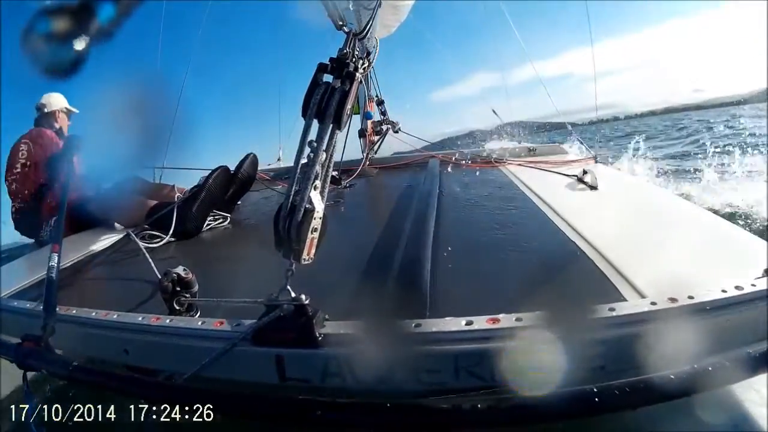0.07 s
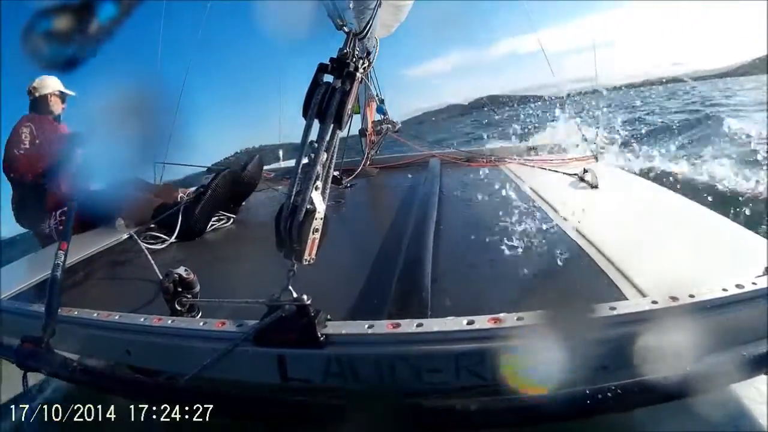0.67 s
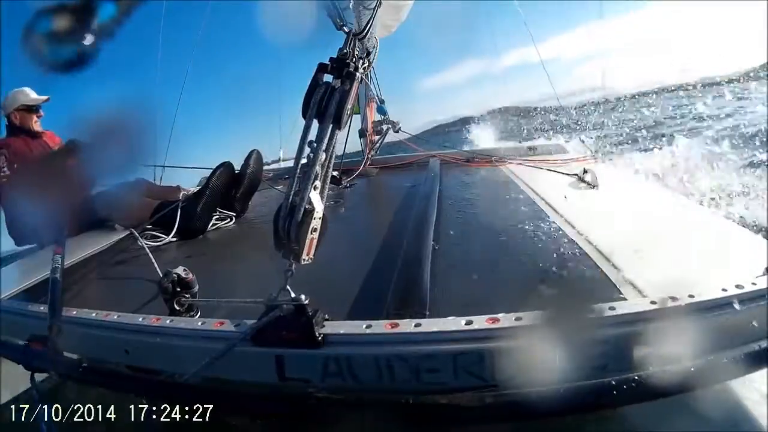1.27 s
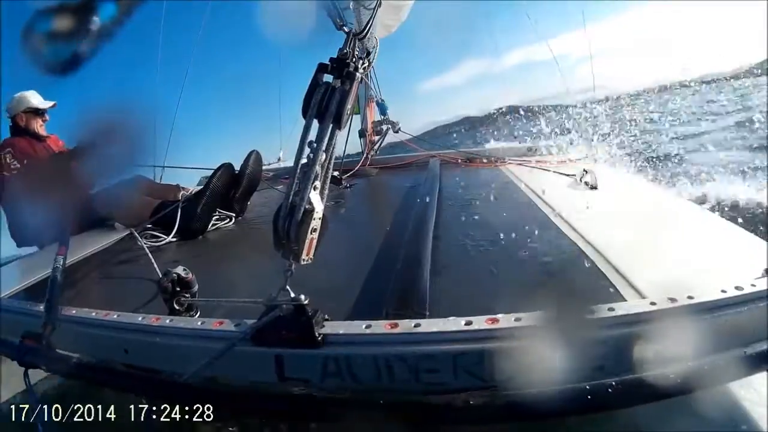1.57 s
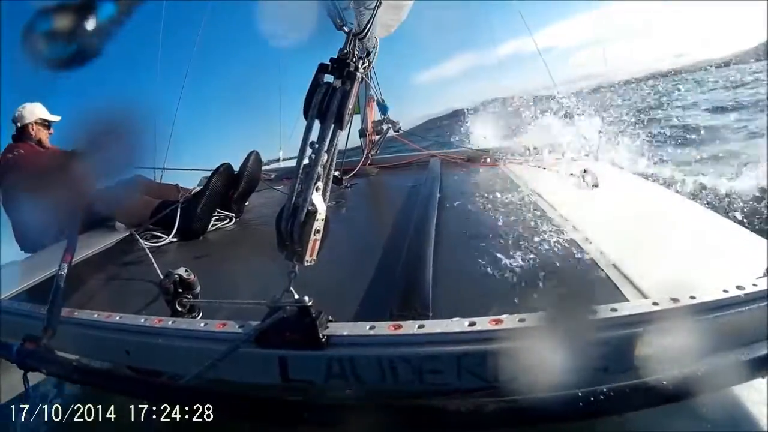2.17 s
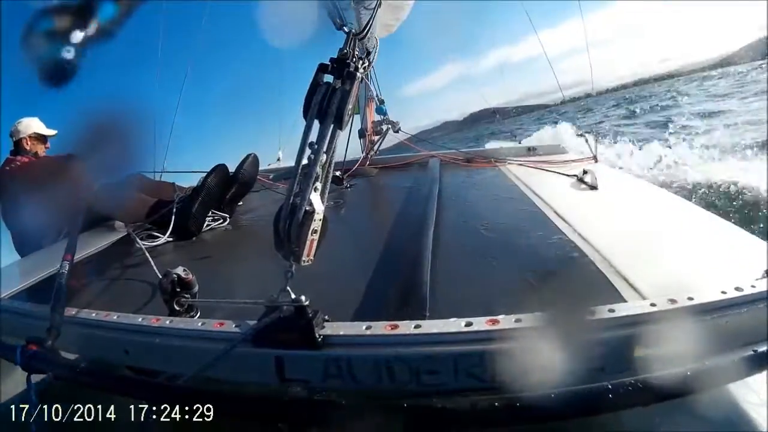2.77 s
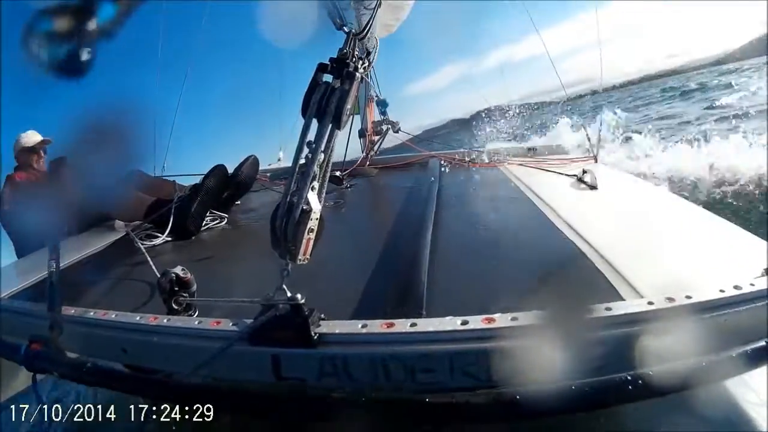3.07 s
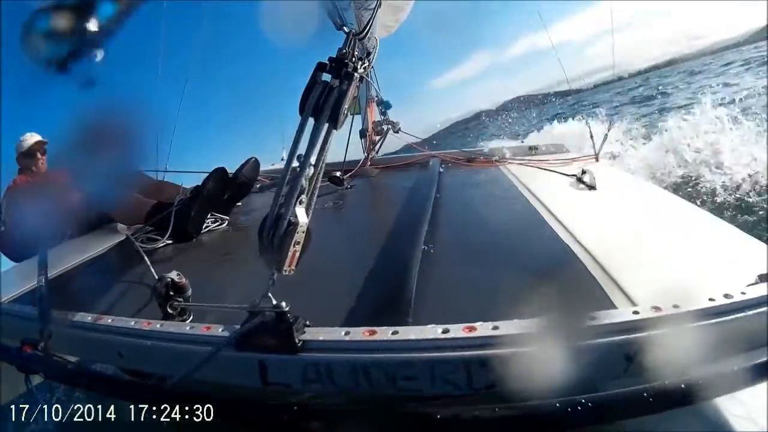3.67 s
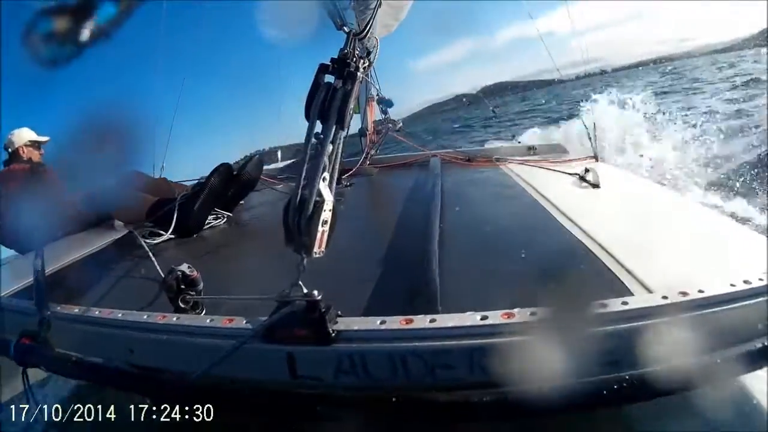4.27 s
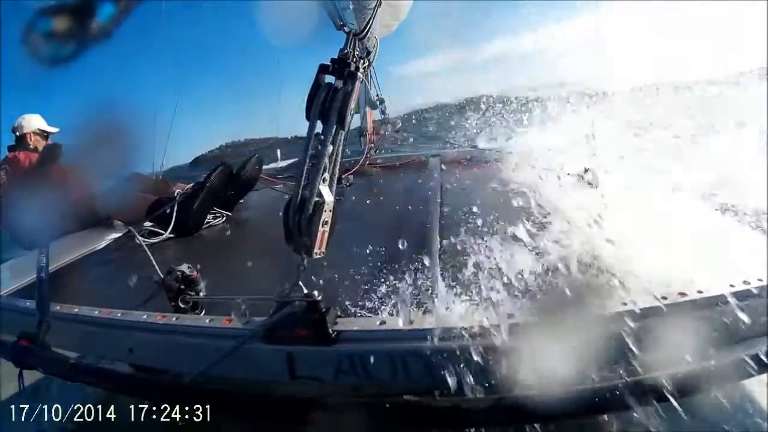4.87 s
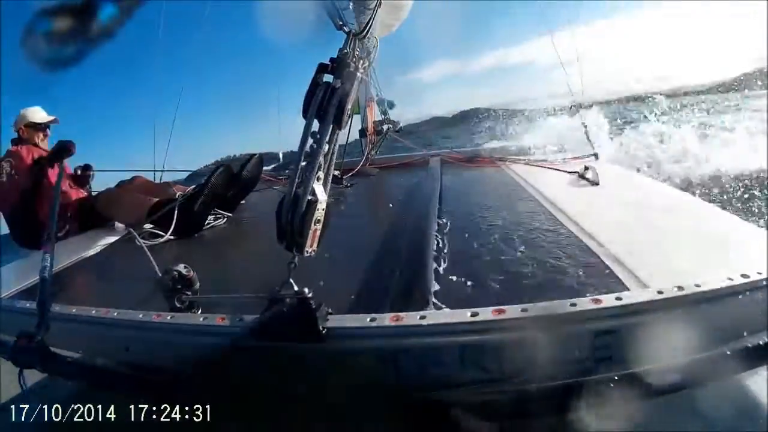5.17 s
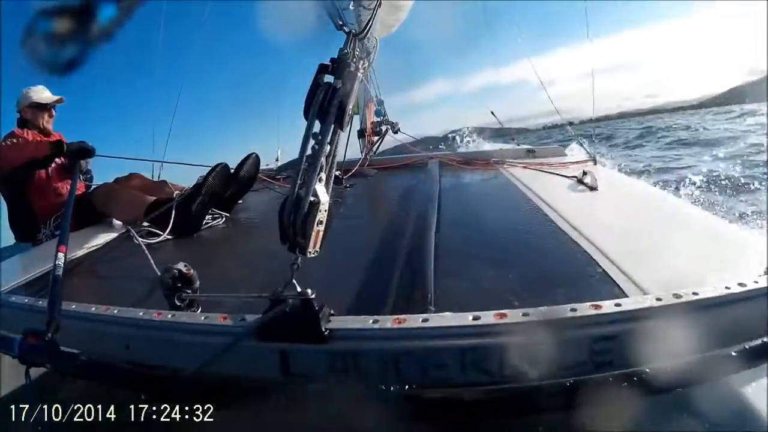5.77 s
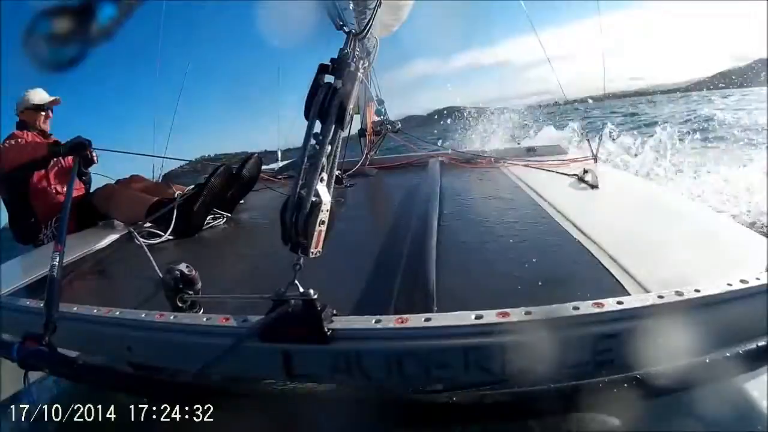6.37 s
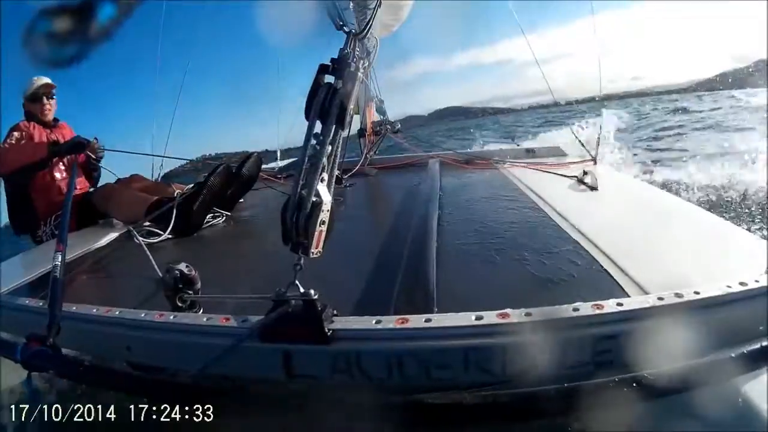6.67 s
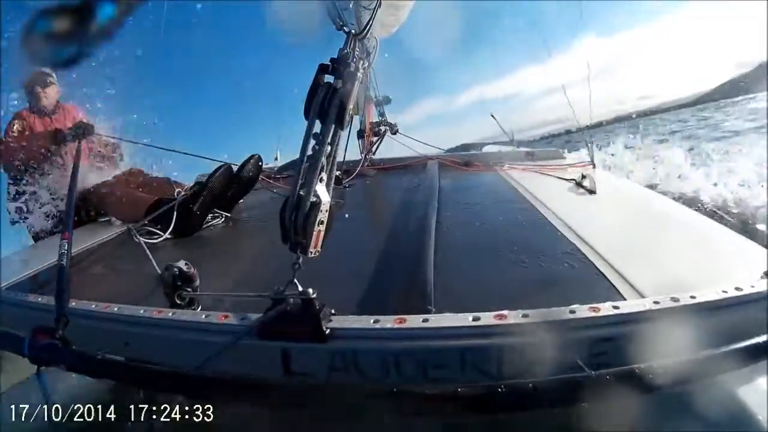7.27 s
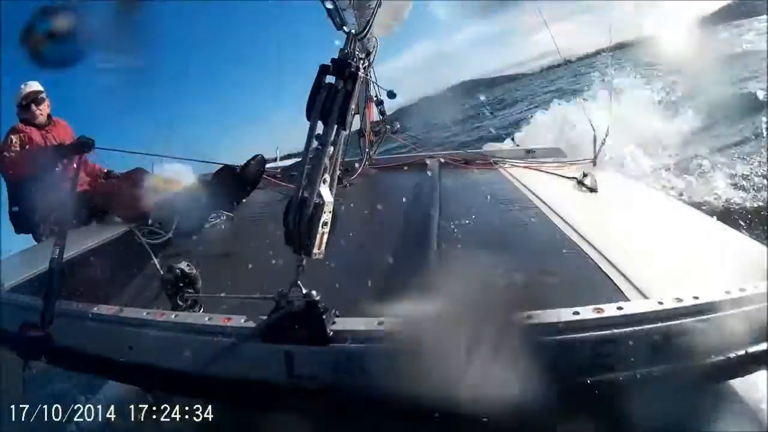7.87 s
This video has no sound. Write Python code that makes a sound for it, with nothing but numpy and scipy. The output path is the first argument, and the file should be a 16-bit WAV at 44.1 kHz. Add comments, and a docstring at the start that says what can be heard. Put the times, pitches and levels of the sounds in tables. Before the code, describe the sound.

A catamaran sails through chop, heard from a microphone in a waterproof case on the stern. Low wind rumble and muffled, hollow churning swell with each wave while spray ticks on the case. Midway, waves knock the hulls in a quick cluster, with rattling fittings, a brief hull groan and a rope creak. Later a hull slams with a boom, then a sheet of water splatters over the microphone.

```python
"""Catamaran through chop

Heard from a camera in a waterproof case on the stern. Wind and water shake the mount into a low boom, and the
wash comes through the case muffled and hollow. Waves slap and slam the hulls; in the hardest shakes fittings
chatter, the boat judders and groans and a rope creaks. Spray patters, then a sheet of water hits."""
import sys
import numpy as np
from scipy import signal
from scipy.fft import rfft, irfft, next_fast_len
from scipy.io import wavfile
from scipy.ndimage import uniform_filter1d, map_coordinates

SR = 44100
rng = np.random.default_rng(int(sys.argv[2]) if len(sys.argv) > 2 else 0)


def generate_wav(sig):
    """Save sig (samples, or channels by samples) to the path in sys.argv[1] as 16-bit PCM at SR."""
    pcm = np.round(np.clip(np.atleast_2d(sig).T, -1, 1) * 32767).astype(np.int16)
    wavfile.write(sys.argv[1], SR, pcm)


N = 348819


def amp(db):
    """Decibels to gain."""
    return 10 ** (np.asarray(db) / 20)


def unit_rms(x):
    """Scaled to rms 1."""
    return x / np.sqrt(np.mean(x ** 2) + 1e-20)


def unit_peak(x):
    """Scaled to peak 1."""
    return x / (np.abs(x).max() + 1e-20)


def eq_db(points, hz):
    """An EQ curve through (freq_hz, gain_db) points, on a log frequency axis."""
    freqs, gains = np.transpose(points)
    return np.interp(np.log(hz + 1), np.log(freqs + 1), gains)


def band_db(hz, centre_hz, q):
    """Gain of one broad resonance."""
    return -10 * np.log10(1 + (q * ((hz + 1) / centre_hz - centre_hz / (hz + 1))) ** 2)


def wobble(rate_hz):
    """A smooth random curve with rate_hz knots a second."""
    knots = rng.standard_normal(int(N * rate_hz / SR) + 4)
    return map_coordinates(knots, [np.arange(N) * rate_hz / SR])


def swell(peak_s, rise_s, fall_s, db):
    """A power envelope that gains 20 dB over the rise and loses 20 dB over the fall."""
    t = np.arange(N) / SR - peak_s
    return amp(db - 20 * np.minimum(np.maximum(-t / rise_s, t / fall_s), 10)) ** 2


def add(track, start_s, x):
    """Mix x into the track at start_s."""
    i = max(round(start_s * SR), 0)
    track[i:i + len(x)] += x[:max(len(track) - i, 0)]


def coloured(x, gain_db):
    """x through the minimum-phase filter whose gain is gain_db(hz)."""
    size = 2 * next_fast_len(len(x) // 2 + 4096)
    cepstrum = irfft(np.log(amp(gain_db(np.fft.rfftfreq(size, 1 / SR)))), size)
    cepstrum[1:size // 2] *= 2
    cepstrum[size // 2 + 1:] = 0
    return irfft(rfft(x, size) * np.exp(rfft(cepstrum)), size)[:len(x)]


def impacts(spread_db, count):
    """Tiny impacts at random moments, a few much larger than the rest."""
    where = rng.integers(0, N, count)
    size = np.minimum(rng.exponential(size=count), 4)
    return unit_rms(np.bincount(where, rng.choice([-1, 1], count) * amp(spread_db * size), N))


def bubbles(pitch_hz, spread, cycles, size_db, count):
    """A cloud of bubbles, each ringing briefly and rising in pitch."""
    t = np.arange(SR // 60) / SR
    turns = pitch_hz * np.exp(spread * rng.standard_normal((count, 1))) * t
    age = turns / cycles
    size = amp(size_db * np.minimum(rng.exponential(size=(count, 1)), 4))
    rings = size * np.sin(2 * np.pi * turns * (1 + 0.076 * age)) * age * np.exp(-4 * age)
    where = rng.integers(0, N, (count, 1)) + np.arange(len(t))
    return unit_rms(np.bincount(where.ravel(), rings.ravel())[:N])


def clean_ring(modes, t):
    """A struck body: one decaying sine for each mode."""
    return sum(amp(db - 60 * t / t60) * np.sin(2 * np.pi * hz * t) for hz, db, t60 in modes)


def rough_ring(modes, attack_s, scatter_db, detune):
    """A short, wavering ring whose modes scatter in level and pitch on every hit."""
    t, ring = np.arange(SR // 20) / SR, 0
    for hz, db, t60 in modes:
        waver = np.cumsum(uniform_filter1d(rng.normal(0, .001 * np.sqrt(hz), len(t)), size=60))
        phase = 2 * np.pi * hz * (1 + detune * rng.normal()) * t + waver
        ring = ring + amp(db + scatter_db * rng.normal() - 60 * t / t60) * np.sin(phase)
    return unit_peak(ring * (1 - np.exp(-(t / attack_s) ** 2)))


# The muffling of the case wall: freq_hz, gain_db
WALL_EQ = [(20, -22.5), (110, -3), (210, 0.5), (400, -11), (750, -15.5), (1030, -19), (1850, -15),
           (2550, -27.5), (4700, -36), (6600, -40), (10000, -39.5), (15000, -49)]
# The case's hollow resonances: centre_hz, width_hz, boost_db
CASE_PEAKS = [(291.5, 48, 14.2), (536.7, 79, 13.36), (1318, 205, 7), (2910, 190, 7.6), (4070, 660, 11.4),
              (5610, 710, 9.7), (7400, 860, 4.9), (11000, 410, 3.2)]

def case_db(hz):
    """The case muffles the treble and rings at its own resonances."""
    peaks_db = sum(db * np.exp(-((hz - centre) / width) ** 2) for centre, width, db in CASE_PEAKS)
    return eq_db(WALL_EQ, hz) + peaks_db


def in_case(x, source_eq):
    """x shaped by its own EQ, then heard through the case."""
    return coloured(x, lambda hz: eq_db(source_eq, hz) + case_db(hz))


# Waves surging along the hulls: crest_s, rise_s, fall_s, boom_db, churn_db, foam_db
WAVES = [(0.87, 0.2, 0.22, -31, -36, -45.5), (2.1, 0.29, 0.52, -39.5, -45, -65),
         (2.93, 0.61, 0.25, -32.5, -47, -51), (3.58, 0.28, 0.17, -20.5, -44.5, -59),
         (4.23, 0.41, 0.17, -21.5, -32.5, -49), (4.85, 0.76, 0.9, -39.5, -40.5, -51.5),
         (5.44, 0.21, 0.25, -30.5, -43.5, -55), (6.64, .4, 0.27, -34.5, -44, -53.5),
         (6.9, 0.08, 0.46, -24, -33.5, -71), (7.56, 0.43, 0.47, -38, -35, -47.5),
         (7.88, 0.094, .3, -44, -37, -50)]
# Gusts buffeting the mount: peak_s, boom_db
GUSTS = [(0.29, -34.5), (1.51, -35), (2.33, -31.5), (4.39, -22.5), (5.03, -33), (6.05, -35), (7.17, -28),
         (7.3, -25.5)]
# The mount's deep, narrow tone: freq_hz, gain_db
BOOM_EQ = [(15, -26), (28, -30.5), (42, -17), (53, -8), (63, -1), (71, -9), (85, -28.5), (110, -24.5),
           (150, -31), (250, -34), (1500, -140)]
BOOM_BED_DB, BOOM_FALL_STRETCH = -41, 1.7

def mount_boom():
    """Waves and gusts keep the mount swaying near its lowest resonance."""
    power = amp(BOOM_BED_DB) ** 2
    power += sum(swell(s, rise, BOOM_FALL_STRETCH * fall, db) for s, rise, fall, db, _, _ in WAVES)
    power += sum(swell(s, rise_s=0.089, fall_s=0.11, db=db) for s, db in GUSTS)
    sway = coloured(rng.standard_normal(N), lambda hz: eq_db(BOOM_EQ, hz))
    running_rms = np.sqrt(np.abs(uniform_filter1d(sway ** 2, size=SR // 12)) + 1e-12)
    return np.sqrt(power) * amp(2.04 * wobble(10)) * sway / running_rms


# The dark body of churning water: freq_hz, gain_db
CHURN_EQ = [(20, -9), (100, -1.5), (620, -1.5), (1100, -5.5), (2500, -6), (6000, -78.5)]
# Fader ride on the churn's upper register: time_s, gain_db
GARGLE_RIDE = [(0, 3), (2.8, 5), (5.2, 1), (7.91, -3)]
CHURN_BED_DB, GARGLE_ABOVE_HZ = -46, 420

def churn():
    """Water churns and gargles under the hulls, swelling with every wave."""
    power = amp(CHURN_BED_DB) ** 2 + sum(swell(s, rise, fall, db) for s, rise, fall, _, db, _ in WAVES)
    flow = unit_rms(in_case(rng.standard_normal(N) * amp(1.67 * wobble(45)), CHURN_EQ))
    drift = np.cumsum(.025 * wobble(7))  # the hollow pitch wanders by a few percent
    flow = map_coordinates(flow, [np.arange(N) + drift], mode="mirror")
    gargle = signal.sosfiltfilt(signal.butter(3, GARGLE_ABOVE_HZ, "high", fs=SR, output="sos"), flow)
    gargle_db = np.interp(np.arange(N) / SR, *np.transpose(GARGLE_RIDE))
    return np.sqrt(power) * (flow - gargle + amp(gargle_db) * gargle)


# The midrange fizz of foam: freq_hz, gain_db
FOAM_EQ = [(300, -37.5), (700, -1), (1100, -1), (2200, 2), (3000, -8.5), (6000, -5), (15000, -27)]
FOAM_BED_DB, FOAM_STRETCH = -55.5, 1.88

def foam():
    """Each wave breaks into bubbling foam, and each slap throws up a little more."""
    power = amp(FOAM_BED_DB) ** 2
    for crest_s, rise_s, fall_s, _, _, db in WAVES:
        power += swell(crest_s, FOAM_STRETCH * rise_s, FOAM_STRETCH * fall_s, db)
    power += sum(swell(s + 0.02, rise_s=.04, fall_s=0.13, db=-54) for s, _, _ in SLAPS)
    froth = rng.standard_normal(N)
    froth += .45 * bubbles(pitch_hz=1550, spread=.3, cycles=7, size_db=2.4, count=5000)
    return np.sqrt(power) * amp(1.66 * wobble(20)) * unit_rms(in_case(froth, FOAM_EQ))


# The airy top of flying spray: freq_hz, gain_db
HISS_EQ = [(800, -36), (2000, -15), (3000, 1.5), (5000, -0.5), (15000, 7.5)]
HISS_BED_DB = -64

def spray_hiss():
    """Flying spray hisses steadily, wavering slightly."""
    mist = rng.standard_normal(N) + .4 * impacts(spread_db=4, count=2500)
    return amp(HISS_BED_DB + 1.5 * wobble(10)) * unit_rms(in_case(mist, HISS_EQ))


# Showers of droplets reaching the case: peak_s, rise_s, fall_s, level_db
SHOWERS = [(.4, 0.13, 0.45, -52), (1.99, 0.054, 0.09, -60), (2.25, 0.2, .25, -61.5),
           (2.61, 0.16, 0.16, -60.5), (3.9, .15, .1, -61), (5.03, 0.73, 0.61, -59), (6.58, 0.22, 0.6, -60),
           (7.31, 0.086, 0.2, -49.5), (7.71, 0.28, 0.27, -44)]
# Their bright patter: freq_hz, gain_db
PATTER_EQ = [(200, -30), (800, -9), (1400, -9.5), (3000, 0.5), (5500, 2.5), (7500, 2.5), (11000, 8.5),
             (15500, 4)]

def spray_patter():
    """Droplets tick on the case, each softened into a millisecond of noise favouring one resonance."""
    power = sum(swell(*shower) for shower in SHOWERS)
    droplets = 0
    for ring_hz in (2900, 4240, 5600, 10800):
        energy = uniform_filter1d(impacts(spread_db=4.6, count=1200) ** 2, size=SR // 1200)
        soft_ticks = np.sqrt(np.abs(energy)) * rng.standard_normal(N)
        droplets = droplets + coloured(soft_ticks, lambda hz: 7 * amp(band_db(hz, ring_hz, q=5.3)))
    return np.sqrt(power) * unit_rms(in_case(droplets, PATTER_EQ))


# Big single drops striking the case: hit_s, level_db, treble_db
DROPS = [(.3647, -43, -1), (0.411, -37, -2), (0.4295, -36, -5), (.4824, -48, -2), (.508, -42, -2),
         (0.5177, -35, -3), (0.547, -32, -21), (0.5947, -28, -18), (0.9112, -37.5, -6), (3.2014, -38, -15),
         (4.1575, -29.5, -9), (4.2665, -21, -12), (4.2768, -24, -8), (4.2882, -27, -16), (4.2942, -30, -7),
         (4.322, -17.5, -9), (4.3405, -22.5, -2), (4.4027, -23, -6), (4.4249, -28, -17), (5.0925, -34, -8),
         (6.9637, -32.5, -18), (7.254, -36, -17), (7.3085, -34.5, -7), (7.459, -40.5, 6), (7.485, -28, -33),
         (7.6647, -23.5, -26), (7.7077, -11, -14), (7.7135, -20.5, -20), (7.7178, -25, -16),
         (7.7455, -29, -17), (7.752, -25, -20), (7.769, -26, -20), (7.849, -25.5, -38), (7.8764, -30, -3.5),
         (7.9014, -26, 2)]
# Bigger drops ring lower: level_db, ring_hz
DROP_RING = [(-35, 4100), (-24, 3000)]
# The crack of a drop: freq_hz, gain_db
DROP_EQ = [(100, -24.5), (600, -16), (1500, -0.5), (2800, 5.5), (4100, -1.5), (6000, 2.5), (15500, 3.5)]
DROP_TRIM_DB = -20.5

def drops():
    """A drop cracks on the case and rings it; bigger drops are fuller and spatter longer."""
    out, t = np.zeros(N), np.arange(-SR // 200, SR // 20) / SR
    age = np.where(t < 0, -6 * t, t)  # a brief noise lead-in softens each drop's attack
    for hit_s, db, treble_db in DROPS:
        ring_hz = np.interp(db, *np.transpose(DROP_RING))
        size_db = db + 28
        spatter_t60_s = 0.0078 * amp(.08 * size_db)
        envelope = 0.19 * amp(-60 * age / spatter_t60_s) + 0.044 * amp(-60 * age / 0.039)
        hit = rng.standard_normal(len(t)) * envelope
        hit += t == 0  # the click of contact
        tilt = [(1200, 0.24 * size_db), (2000, 0), (8000, treble_db + 11.5)]
        tone_db = lambda hz: eq_db(tilt, hz) + 4 * amp(band_db(hz, ring_hz, q=5.2))
        tick = coloured(hit, lambda hz: case_db(hz) + eq_db(DROP_EQ, hz) + tone_db(hz))
        add(out, hit_s + t[0] + 0.000825, amp(db + DROP_TRIM_DB) * unit_rms(tick))
    return out


# Air pockets closing in the water: start_s, peak_db, pitch_hz
PLOPS = [(.6296, -42, 3600), (.68, -36.5, 1490), (2.979, -34.5, 1600), (3.32, -33.5, 590),
         (4.802, -28.5, 1970), (5.494, -32, 585), (7.063, -37.5, 860), (7.143, -35.5, 613),
         (7.149, -37.5, 2120), (7.527, -37, 560), (7.688, -27, 1370), (7.7262, -13, 1840),
         (7.744, -34.5, 560), (7.822, -34, 3050), (7.864, -30.5, 602)]

def plops():
    """Larger air pockets ring for a few cycles as they close."""
    out, t = np.zeros(N), np.arange(SR // 25) / SR
    for start_s, db, pitch_hz in PLOPS:
        turns = pitch_hz * t
        envelope = unit_peak((1 - np.exp(-turns / 3)) ** 2 * amp(-60 * turns / 14))
        add(out, start_s, amp(db) * envelope * np.sin(2 * np.pi * turns))
    return out


# Waves slapping the hulls: start_s, level_db, pitch_hz
SLAPS = [(0.837, -30, 98), (2.295, -25.5, 238), (3.212, -28.5, 237), (3.565, -19.5, 190), (3.882, -29, 330),
         (4.033, -21, 286), (4.099, -19.5, 150), (4.212, -16.5, 156), (4.25, -17.5, 286), (4.566, -30, 554),
         (5.021, -25, 267), (5.26, -30.5, 233), (5.466, -32, 550), (5.836, -25, 214), (6.278, -31, 317),
         (6.949, -23, 265), (7.13, -25, 299)]
SLAP_TRIM_DB = -4.5

def hull_slaps():
    """A wave gives the hull a soft, hollow knock with a short gush."""
    out, t = np.zeros(N), np.arange(SR // 5) / SR
    envelope = unit_peak((1 - np.exp(-t / 0.0025)) ** 2 * amp(-60 * t / 0.098))
    for start_s, db, pitch_hz in SLAPS:
        knock = np.sin(2 * np.pi * pitch_hz * t)
        gush = unit_rms(in_case(rng.standard_normal(len(t)), CHURN_EQ))
        add(out, start_s, amp(db + SLAP_TRIM_DB) * envelope * (knock + 0.51 * gush))
    return out


# Runs of knocks from loose fittings: start_s, length_s, rate_hz, peak_db, treble_db
CHATTER = [(3.529, .02, 72, -31, -42), (3.566, .04, 72, -38, -26), (3.625, .01, 68, -31, -54),
           (4.232, .007, 220, -24.5, 7), (4.243, .02, 80, -29, 2), (6.865, 0.028, 193, -25, 0.5)]

def fittings_chatter():
    """Hard shakes make loose fittings knock in quick, uneven runs."""
    out, t = np.zeros(N), np.arange(SR // 30) / SR
    for start_s, length_s, rate_hz, db, treble_db in CHATTER:
        knock_eq = [(1700, -17), (2400, 4), (2800, -9.0), (4300, treble_db / 3 + 0.5),
                    (4900, treble_db), (14000, treble_db - 12)]
        for lag_s in np.arange(0, length_s, 1 / rate_hz):
            scuff = rng.standard_normal(len(t)) * amp(-60 * t / (2.0 / rate_hz))
            knock = unit_peak(in_case(scuff, knock_eq))
            jitter_s = rng.normal(0, 0.041) / rate_hz
            add(out, start_s + lag_s + jitter_s, amp(db + rng.normal(0, 1.1)) * knock)
    return out


# The groan's contour through the judder: time_s, peak_db
GROAN_RIDE = [(3.887, -31.5), (3.99, -26), (4.06, -20.5), (4.1, -28), (4.14, -27), (4.21, -21.5),
              (4.26, -23.5), (4.32, -41)]
# What each jolt rings: pitch_hz, level_db, t60_s
GROAN_MODES = [(284.7, -4.5, 0.052), (555, -0.5, .04), (660, -4, .026), (800, -10, .02), (1460, -13, .018),
               (2150, -14, .018)]
JOLT_COUNT, JUDDER_HZ, GROAN_NOTE_HZ = 28, 63, 570

def judder_groan():
    """A fast judder, each jolt ringing a few low tones; at the height it sings hoarsely."""
    out = np.zeros(N)
    times, levels = np.transpose(GROAN_RIDE)
    for jolt_s in times[0] + np.arange(JOLT_COUNT) / JUDDER_HZ:
        db = np.interp(jolt_s, times, levels) + rng.normal(0, 1)
        add(out, jolt_s, amp(db) * rough_ring(GROAN_MODES, attack_s=0.0042, scatter_db=2.0, detune=.025))
    pitch_hz = GROAN_NOTE_HZ * (1 + .06 * wobble(130))
    note = np.sin(2 * np.pi * np.cumsum(pitch_hz) / SR)
    return out + np.sqrt(swell(peak_s=4.072, rise_s=.09, fall_s=.035, db=-21.5)) * note


# A loaded rope creaking (rows of negative length are silent): start_s, length_s, peak_db
CREAKS = [(4.047, -0.2, -32), (4.08, .005, -27), (4.108, 0.2, -27), (4.127, -0.1, -26),
          (4.195, .075, -22.5), (4.284, .005, -28.5), (4.318, -0.02, -23)]
# The ring of the rope's block: pitch_hz, level_db, t60_s
BLOCK_MODES = [(1463, 2, 0.025), (1740, -10, 0.023), (2096, -0.5, 0.026), (2350, -11, 0.02),
               (4050, -16.5, 0.016), (10600, -18, 0.011)]
SLIP_GAP_S, SLIP_FADE_DB_PER_S = .0135, 64

def rope_creak():
    """The rope sticks, then gives in one slip or a quick run; every slip rings the block roughly."""
    out = np.zeros(N)
    for start_s, length_s, db in CREAKS:
        for lag_s in np.arange(0, length_s, SLIP_GAP_S):
            slip = rough_ring(BLOCK_MODES, attack_s=0.0031, scatter_db=2.5, detune=0.029)
            add(out, start_s + lag_s, amp(db - SLIP_FADE_DB_PER_S * lag_s) * slip)
    return out


# The hull's low ring: pitch_hz, level_db, t60_s
HULL_MODES = [(283, 10, 0.15), (160.5, -10.5, 0.5), (270.5, -11.5, 0.87), (334, -2, 0.11)]

def hull_slam(start_s=6.849, peak_db=-11.5, attack_s=0.01096):
    """The windward hull drops flat on a wave and booms."""
    out, t = np.zeros(N), np.arange(SR // 2) / SR
    attack = 1 - np.exp(-(t / attack_s) ** 2)
    add(out, start_s, amp(peak_db) * unit_peak(clean_ring(HULL_MODES, t) * attack))
    return out


# The wet bite of thrown water: freq_hz, gain_db
SPLATTER_EQ = [(200, -17), (450, -9), (850, 4), (1400, -1), (2700, 6), (5500, 2), (12000, -10)]

def water_sheet():
    """A sheet of thrown water breaks over the case in a dense splatter of impacts and bubbles."""
    splatter = impacts(spread_db=3.5, count=9000)
    splatter += bubbles(pitch_hz=1300, spread=.5, cycles=4, size_db=3, count=3500)
    power = swell(peak_s=7.7, rise_s=.22, fall_s=.12, db=-37)
    return np.sqrt(power) * unit_rms(in_case(splatter, SPLATTER_EQ))


# The ring of the case's shell: pitch_hz, level_db, t60_s
SHELL_MODES = [(185, -12, .03), (720, -9, .009), (1370, -3, .016), (1850, -4, .015), (2850, -2, .012),
               (5750, -6, .009)]

def dollop(start_s=7.7083, peak_db=-8.5):
    """A fat dollop of water lands on the case and flexes it: a dull push under a short, hard ring."""
    out, t = np.zeros(N), np.arange(SR // 15) / SR
    add(out, start_s, amp(peak_db) * unit_peak(clean_ring(SHELL_MODES, t)))
    return out


def scene():
    """Water and boat reach one microphone inside the case."""
    wash = churn() + foam()
    spray = spray_hiss() + spray_patter() + water_sheet()
    water_hits = hull_slaps() + drops() + dollop() + plops()
    boat = mount_boom() + judder_groan() + hull_slam() + fittings_chatter() + rope_creak()
    return (wash + spray + water_hits + boat)[None]


DUCK_THRESHOLD_DB, DUCK_SLOPE, DUCK_LAG_S, TOP_HZ = -28.5, .55, 0.03, 15800

def record(dry):
    """The camera's gain control ducks after heavy thumps; nothing passes above its band limit."""
    pole = np.exp(-1 / (DUCK_LAG_S * SR))
    smooth = lambda x: signal.lfilter([1 - pole], [1, -pole], x)
    level_db = 10 * np.log10(smooth(dry ** 2) + 1e-12)
    over_db = np.maximum(level_db - DUCK_THRESHOLD_DB, 0)
    ducked = dry * amp(smooth(-DUCK_SLOPE * over_db))
    size = next_fast_len(N + SR // 2)
    passband = np.fft.rfftfreq(size, 1 / SR) < TOP_HZ
    return irfft(rfft(ducked, size) * passband, size)[..., :N]


dry = scene()
out = record(dry)
generate_wav(out)
```